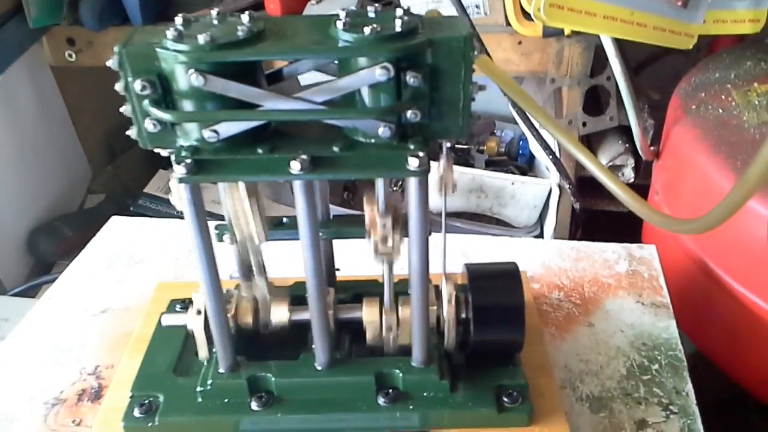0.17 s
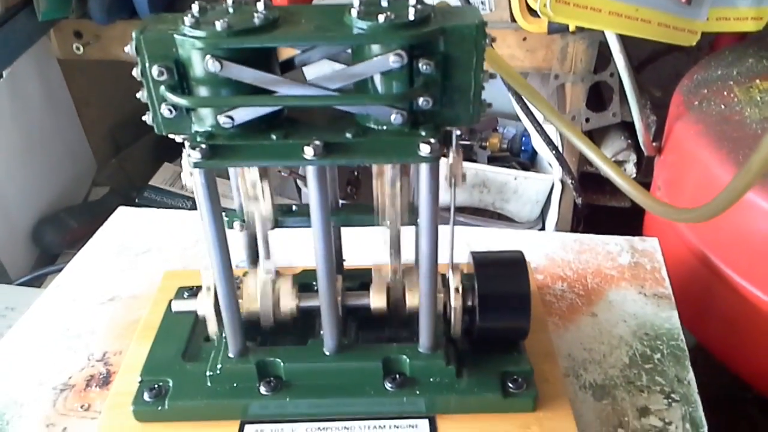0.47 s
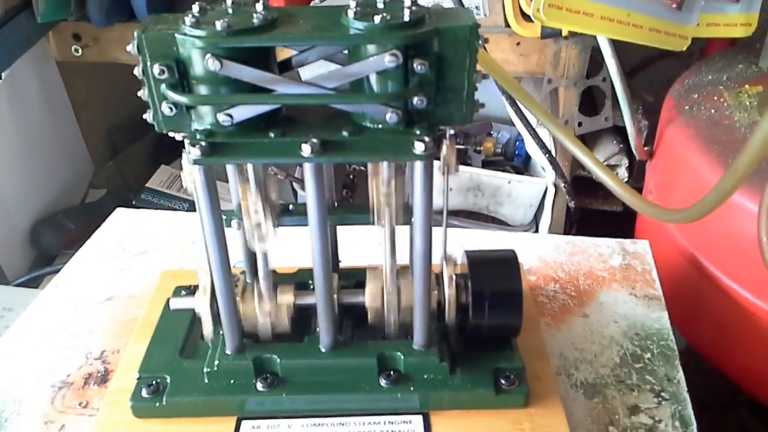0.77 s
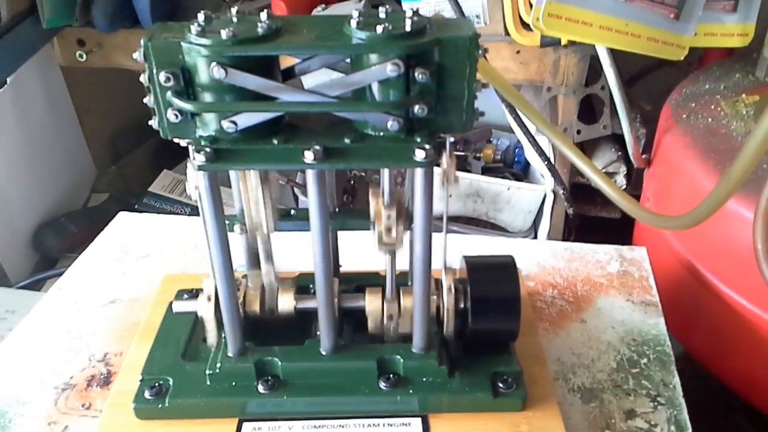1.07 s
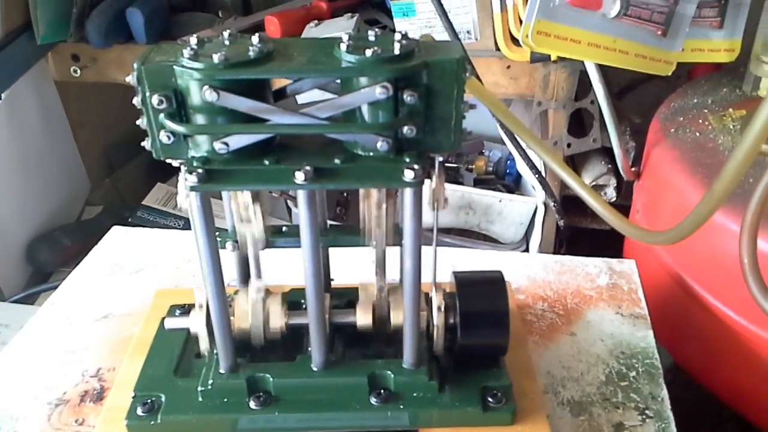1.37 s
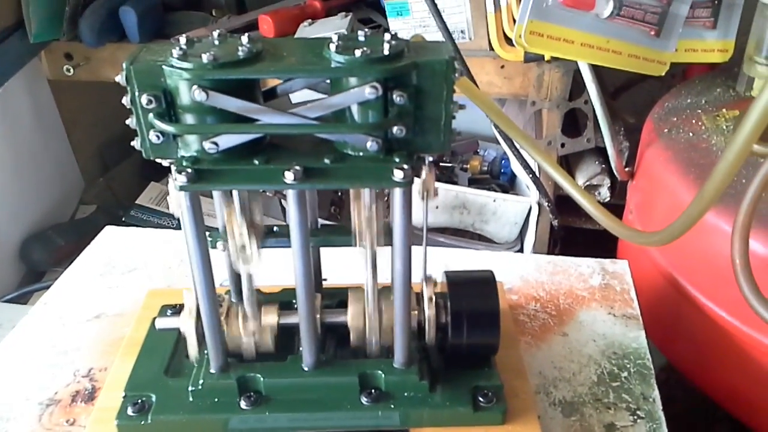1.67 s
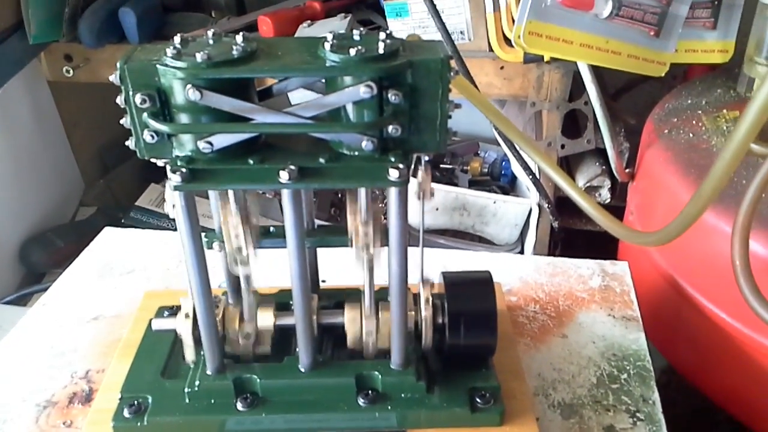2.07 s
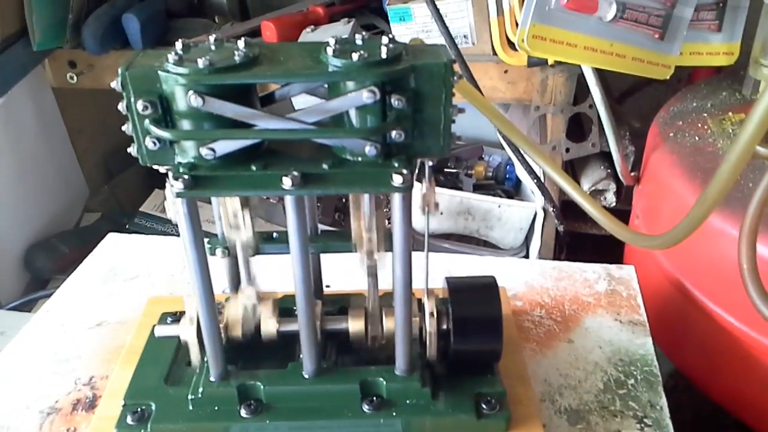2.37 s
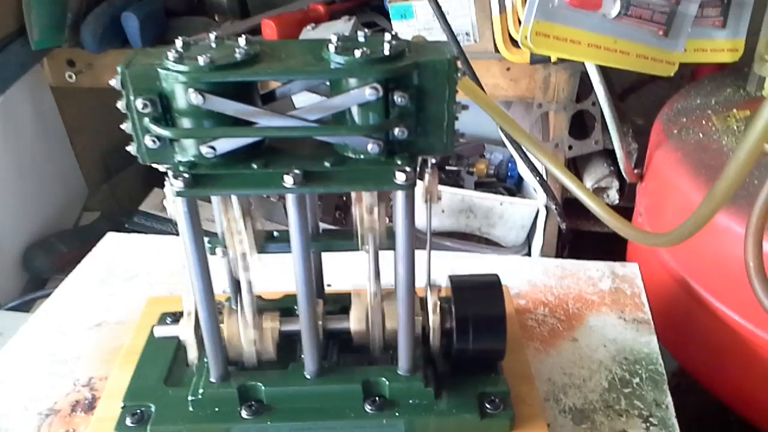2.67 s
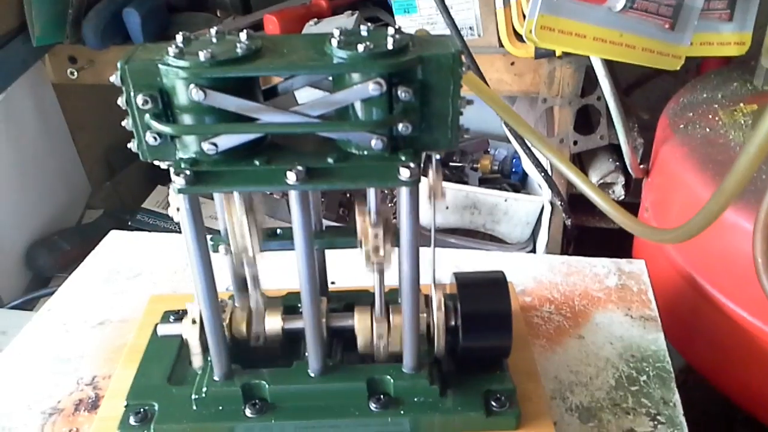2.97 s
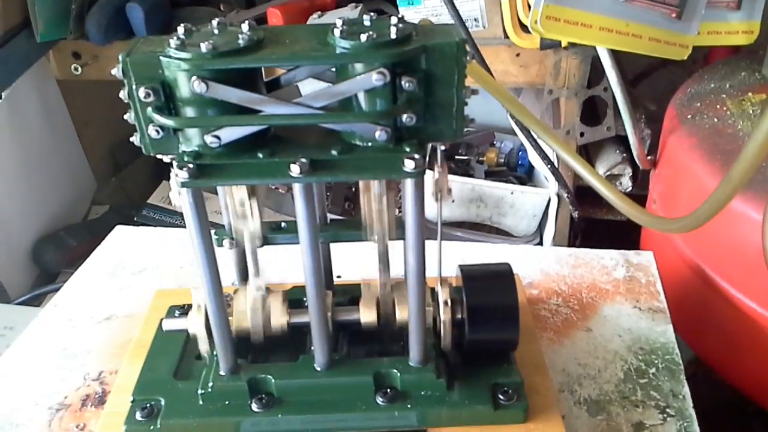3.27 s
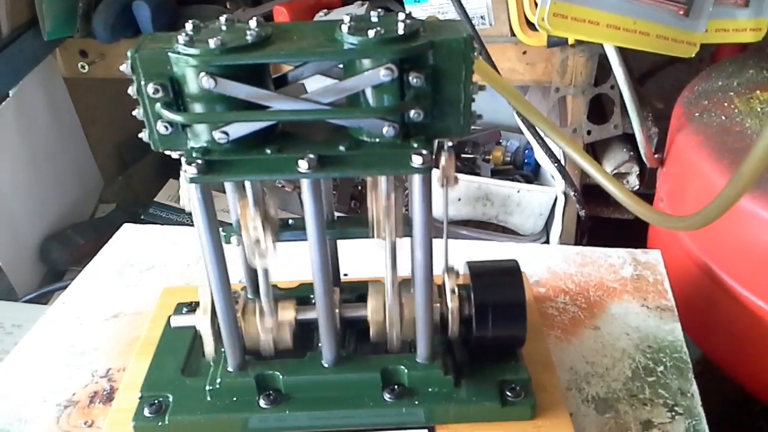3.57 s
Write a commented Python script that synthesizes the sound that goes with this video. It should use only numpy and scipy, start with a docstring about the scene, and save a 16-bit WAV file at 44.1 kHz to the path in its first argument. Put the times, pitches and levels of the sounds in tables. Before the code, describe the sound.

A small twin-cylinder model steam engine runs close to the microphone in a workshop, repeating a dense string of sharp metal ticks about twelve times a second, with airy exhaust hiss, steady from start to end.

```python
"""A small twin-cylinder model engine, close to a mono camera, runs on compressed air at about twelve turns a second.
Rods and valve gear repeat one string of knocks and ticks every turn: decaying clicks that excite frame modes.
Brief bright noise bursts mark some of the contacts; base plate and bench are struck as banks of damped modes.
Sliding parts drive frame and base with gritty noise; exhaust air is coloured noise with narrow resonances.
A short noisy wall tail and a low, unsteady background noise complete the sound."""
import sys
import numpy as np
from scipy import signal
from scipy.fft import rfft, irfft
from scipy.io import wavfile
from scipy.ndimage import uniform_filter1d

SR = 44100
rng = np.random.default_rng(int(sys.argv[2]) if len(sys.argv) > 2 else 0)


def generate_wav(signal):
    """Clip the signal to [-1, 1] and save it as 16-bit WAV at the path in sys.argv[1]."""
    frames = np.transpose(np.atleast_2d(signal))
    scaled = np.clip(frames, -1, 1) * 32767
    pcm = np.round(scaled).astype(np.int16)
    wavfile.write(sys.argv[1], SR, pcm)


N = 164493

# Knocks of one turn: (time after top centre [s], click level [dB], click pitch [Hz], frame drive level [dB])
KNOCKS = [(.0009, -6.5, 4340, -14), (.0023, -18.5, 1900, -41), (.0026, -8.5, 5860, -37),
          (.0029, -7, 3890, -14), (.0046, -20, 2076, -51), (.0049, -9.5, 3245, -22),
          (.0047, -15.5, 5230, -29), (.0066, -3, 4030, -27), (.0067, -21, 1995, -27.5),
          (.0082, -15.5, 4440, -45), (.0097, -6.5, 3360, -27.5), (0.0116, -15.5, 3390, -52),
          (0.013, -21.5, 2120, -31), (0.0152, -9, 3930, -49), (0.0170, -16.5, 1975, -17),
          (0.0182, -20, 3650, -52), (0.024, -33, 5450, -56), (0.0272, -17, 5300, -25),
          (0.0326, -11, 5500, -33), (0.033, -10, 3590, -24), (.0360, -8, 4130, -31),
          (0.0381, -31, 3400, -25.5), (0.0440, -22.5, 2240, -32), (0.0440, -10, 3800, -17.5),
          (0.0442, -16, 4200, -30), (.0473, 2.5, 4080, -22), (0.0470, -11, 5720, -21.5),
          (0.0524, -9.5, 3550, -17.5), (0.0574, -10, 3090, -25.5), (0.062, -4, 4260, -22.5),
          (0.0621, -6.5, 5670, -50), (0.0619, -22, 1920, -19), (.0645, -24, 2180, -49),
          (0.0663, -8.5, 4140, -47.5), (0.0673, -12, 3950, -30), (0.067, -22.5, 1920, -55),
          (0.0708, -15.5, 4460, -57)]
# Modes of the iron frame: (frequency [Hz], level [dB], decay to -60 dB [s])
FRAME_MODES = [(1850, -11, 0.014), (1990, -3, 0.012), (2256, -10.5, 0.044), (2427, -10, 0.024),
               (2970, -13, 0.026), (3223, -2, 0.028), (3420, -1, 0.012), (3789, -2, 0.029),
               (4140, -7, 0.024), (4218, 2.5, 0.024), (4417, -2.5, 0.024), (4812, -10.5, 0.045),
               (5695, -8, 0.022), (5940, -11.5, 0.006)]
# Brief noise bursts at some of the contacts: (time after top centre [s], level [dB], centre frequency [Hz])
CRACKS = [(.0024, -14, 8600), (.0040, -19, 9000), (.0278, -21, 11500), (.0445, -23, 9500),
          (.0475, -25, 9000), (.0620, -25, 9000)]
# Stroke reversals striking the base plate: (time after top centre [s], level [dB])
BASE_BLOWS = [(.0029, -21), (.0110, -28), (.0240, -30.5), (.0322, -28), (.0390, -32), (.0460, -28.5),
              (.0602, -31)]
# Base plate mode frequencies: (frequency [Hz])
BASE_HZ = [760, 900, 1050, 1198, 1268, 1403, 1670]
# Response of each base plate mode: (level [dB], decay to -60 dB [s])
BASE_RING = [(-6, 0.018), (-4, 0.012), (-5, .016), (-8.5, 0.091), (0, 0.061), (2.5, 0.059), (-11.5, 0.09)]
# Pushes on the bench: (time after top centre [s], level [dB], pitch struck best [Hz])
BENCH_BLOWS = [(.000, -43, 159), (.004, -36.5, 113), (.013, -38, 284), (0.017, -45.5, 50),
               (.022, -43.5, 147), (.024, -41.5, 300), (.030, -39, 95), (.052, -46, 298), (.057, -41.5, 94),
               (.065, -42, 283), (.074, -39.5, 148)]
# Bench mode frequencies: (frequency [Hz])
BENCH_HZ = [48, 80, 109, 148, 190, 255, 353]
# Response of each bench mode: (level [dB], decay to -60 dB [s])
BENCH_RING = [(-3, 0.08), (-6, 0.089), (-2, 0.14), (-0.5, 0.1), (3.5, 0.03), (-2.5, 0.072), (-9.5, 0.36)]
# Sliding friction at every 30 degrees of the crank from top centre: (level [dB])
RUB_DB = [-18, -25.5, -30.5, -30.5, -34, -33.5, -28.5, -31, -34, -28, -29.5, -32]
# Exhaust flow noise at every 30 degrees of the crank from top centre: (level [dB])
HISS_DB = [-29.5, -27.5, -32.5, -32.5, -34.5, -25.5, -25, -24, -26.5, -26, -32.5, -29]
# Relative spectrum of the exhaust hiss: (frequency [Hz], level [dB])
HISS_SPECTRUM = [(500, -11), (1500, 1.5), (3000, 8.5), (5000, 10.5), (6100, -2.5), (7400, 2), (8500, 2.5),
                 (10500, -3), (12500, 2), (13400, -13), (15000, -10.5)]
# Resonances of the exhaust passages: (frequency [Hz], bandwidth [Hz], level [dB])
PORTS = [(6090, 160, -7.5), (6480, 99, -11), (6890, 64, -12), (7385, 270, -8.5), (10370, 180, -28),
         (10670, 180, -15)]
# Level of the whole engine: (time [s], level [dB])
ENGINE_LEVEL = [(0, -2), (1.3, -2), (1.798, -1.4), (2.6, -0.8), (3.73, -1.5)]
# Change in the first rattle of each turn: (time [s], added level [dB], delay [s])
SETTLE = [(0, 0, 0.00028), (1.198, 0.5, 0), (1.699, 1.5, 0.00079), (3.73, 0.5, 0.00036)]
# Relative spectrum of the background noise: (frequency [Hz], level [dB])
ROOM_SPECTRUM = [(15, -43), (25, -10), (119, -14), (356, -4), (428, -20), (484, -9), (560, -12), (800, -8),
                 (1000, -8), (1300, -21), (2200, -60)]

FIRST_TURN_S, TURN_S, SLOWING_S = .01816, .0817245, 1.2768e-5  # the last multiplies the turn number squared
STRETCH = 0.2  # share of the slowing that reaches the blow times
OPENING_S = .012  # length of the first rattle of a turn
UNEVEN_S, UNEVEN_DB = (.061, .064), 3  # part of the turn that alternates, loud turn against soft turn
JITTER_S, SCATTER_DB = .00003, .7  # spread of each blow in time and level
ACCENT_DB, ACCENT_TURNS = .9, 3  # drift in strength, averaged over this many turns
CLICK_CYCLES, CLICK_RISE_S = 17.04, .00041  # cycles to decay to -60 dB; time constant of the onset
REACH_OCT, MODE_SCATTER_DB, DETUNE = 0.88, .9, .008  # DETUNE is the relative spread of click pitch
CRACK_S, CRACK_WIDTH = 0.0015, 0.11  # decay time constant; half bandwidth over centre frequency
ENGINE_LOW_HZ, BENCH_LOW_HZ = 700, 32  # high-pass cutoffs
BENCH_PUSH_S, BENCH_REACH_OCT, BENCH_SCATTER_DB = 0.0024, .35, 1.5
RUB_GRIT_DB, GRIT_MAX, RUB_BASE_DB = 2.5, 3.5, -8.5  # dB per unit of grit; largest grit; base against frame
FLOW_SPREAD_DB = .7  # unsteadiness of rub and hiss
SHED_T60_S, SHED_DB = 0.033, -14.5
ROOM_DB, ROOM_SPREAD_DB = -51.5, 4
CEILING, MIC_GAIN, TOP_HZ = .97, 1.25, 14700


def knocks():
    """Impact and modal excitation: each contact clicks at its pitch and drives the frame modes near it."""
    t = np.arange(256) / SR
    clicks = np.zeros(N + len(t))
    hits = np.zeros((len(FRAME_MODES), N))
    modes_hz = np.array(FRAME_MODES)[:, 0]
    for s, click_db, hz, frame_db in KNOCKS:
        nearness = np.exp(-.5 * (np.log2(modes_hz / hz) / REACH_OCT) ** 2)
        reach = nearness * undb(frame_db - click_db)
        decay = np.exp(-np.log(1000) * t * hz / CLICK_CYCLES)
        shape = 2 * (1 - np.exp(-t / CLICK_RISE_S)) * decay
        for at, size, chance in zip(*blows(s, click_db, count=1 + len(FRAME_MODES))):
            click_hz = hz * (1 + DETUNE * chance[0])
            clicks[at:at + len(t)] += size * shape * np.sin(2 * np.pi * click_hz * t)
            hits[:, at] += size * undb(MODE_SCATTER_DB * chance[1:]) * reach
    return cut_low(clicks[:N] + body(hits, FRAME_MODES))


def cracks():
    """Band-limited contact noise: brief bright bursts at some of the contacts."""
    out = np.zeros(N)
    fade = np.exp(-np.arange(200) / SR / CRACK_S)
    for s, db, hz in CRACKS:
        envelope = np.convolve(struck([(s, db)]), fade)[:N]
        burst = envelope * rng.standard_normal(N)
        edges = hz * (1 - CRACK_WIDTH), hz * (1 + CRACK_WIDTH)
        out += signal.sosfilt(signal.butter(2, edges, "bandpass", fs=SR, output="sos"), burst)
    return out


def base_plate():
    """Impulse response of a plate: stroke reversals set its damped modes ringing."""
    return cut_low(body([struck(BASE_BLOWS)] * len(BASE_HZ), np.c_[BASE_HZ, BASE_RING]))


def bench():
    """Soft forcing: smooth pushes from moving parts ring nearby bench modes, unevenly from turn to turn."""
    hits = np.zeros((len(BENCH_HZ), N))
    for s, db, hz in BENCH_BLOWS:
        reach = np.exp(-.5 * (np.log2(np.array(BENCH_HZ) / hz) / BENCH_REACH_OCT) ** 2)
        at, size, chance = blows(s, db, count=len(BENCH_HZ))
        hits[:, at] += size * undb(BENCH_SCATTER_DB * chance.T) * reach[:, None]
    # all bench modes keep the same sign
    rings = sum(undb(db) * ring(x, hz, t60) for x, hz, (db, t60) in zip(hits, BENCH_HZ, BENCH_RING))
    push = np.hanning(int(BENCH_PUSH_S * SR) + 2)
    pushed = np.convolve(rings, push / push.sum())[:N]
    return signal.sosfilt(signal.butter(2, BENCH_LOW_HZ, "highpass", fs=SR, output="sos"), pushed)


def rub():
    """Friction excitation: irregular sliding noise, following the crank, drives frame and base modes."""
    size = undb(RUB_GRIT_DB * np.minimum(rng.exponential(size=N), GRIT_MAX))
    grit = crank_level(RUB_DB) * unit(rng.standard_normal(N) * size)
    frame = unit(body([grit] * len(FRAME_MODES), FRAME_MODES))
    base = unit(body([grit] * len(BASE_HZ), np.c_[BASE_HZ, BASE_RING]))
    gain = np.sqrt(np.mean(grit ** 2))  # restores the friction level after normalising
    return cut_low(gain * (frame + undb(RUB_BASE_DB) * base))


def hiss():
    """Flow noise and passage resonance: exhaust air hisses and whistles, swelling with the crank."""
    air = coloured(HISS_SPECTRUM)
    for hz, width, db in PORTS:
        t60 = np.log(1000) / np.pi / width  # decay time follows from bandwidth
        air = air + undb(db) * unit(ring(rng.standard_normal(N), hz, t60))
    return cut_low(crank_level(HISS_DB) * air)


def shed(x):
    """Diffuse reflection: the walls return a short, noisy, exponentially decaying tail."""
    t = np.arange(int(.25 * SR)) / SR
    tail = rng.standard_normal(len(t)) * np.exp(-np.log(1000) * t / SHED_T60_S) * (t > .002)
    return undb(SHED_DB) * signal.fftconvolve(x, tail / np.sqrt(np.sum(tail ** 2)))[:N]


def background():
    """Coloured random noise: a low, unsteady background."""
    return undb(ROOM_DB + ROOM_SPREAD_DB * walk(21)) * coloured(ROOM_SPECTRUM)


def turns():
    """Rotational kinematics: top-centre times [s] of an engine that slows a little."""
    k = np.arange(-1, 47)
    return FIRST_TURN_S + TURN_S * k + SLOWING_S * k ** 2


def blows(s, db, count):
    """Cyclic impact: sample, size and spare chance of a blow s seconds after every top centre."""
    start = turns()
    period = np.gradient(start)
    stretch = 1 + STRETCH * (period / np.mean(period) - 1)
    chance = rng.standard_normal((len(start), 3 + count))
    when, firm_db, late_s = np.array(SETTLE).T
    opening = s < OPENING_S
    firm_db = np.interp(start, when, firm_db) * opening
    late_s = np.interp(start, when, late_s) * opening
    at = np.round((start + s * stretch + late_s + JITTER_S * chance[:, 0]) * SR).astype(int)
    alternate = (-1) ** np.arange(len(start)) / 2 * (UNEVEN_S[0] < s < UNEVEN_S[1])
    accent = ACCENT_DB * unit(uniform_filter1d(chance[:, 2], size=ACCENT_TURNS))
    size = undb(db + firm_db + accent + SCATTER_DB * chance[:, 1] + UNEVEN_DB * alternate)
    keep = (at >= 0) & (at < N)
    return at[keep], size[keep], chance[keep, 3:]


def struck(table):
    """Impulsive forcing: an impulse train from (time [s], level [dB]) rows, repeated every turn."""
    x = np.zeros(N)
    for s, db in table:
        at, size, _ = blows(s, db, count=0)
        x[at] += size
    return x


def crank_level(db):
    """Periodic modulation: gain that follows the crank angle, slightly unsteady."""
    start = turns()
    crank = np.interp(np.arange(N) / SR, start, np.arange(len(start))) * len(db)
    return undb(np.interp(crank, np.arange(len(db)), db, period=len(db)) + FLOW_SPREAD_DB * walk(58))


def cut_low(x):
    """High-pass filtering: removes the low end of knocks, base, rub and hiss."""
    return signal.sosfilt(signal.butter(4, ENGINE_LOW_HZ, "highpass", fs=SR, output="sos"), x)


def ring(x, hz, t60):
    """Damped resonator: one decaying mode, in which a unit blow starts a sine of size 1."""
    r = np.exp(-np.log(1000) / (t60 * SR))
    w = 2 * np.pi * hz / SR
    return signal.lfilter([0, np.sin(w)], [1, -2 * r * np.cos(w), r * r], x)


def body(drives, modes):
    """Modal superposition: one drive per mode, with neighbouring modes in opposite phase."""
    return sum((-1) ** k * undb(db) * ring(x, hz, t60)
               for k, (x, (hz, db, t60)) in enumerate(zip(drives, modes)))


def coloured(points):
    """Spectral shaping: noise of rms 1 from (frequency [Hz], level [dB]) points."""
    hz, db = np.array(points).T
    f = np.maximum(np.arange(N // 2 + 1) * SR / N, 1)
    gain = undb(np.interp(np.log(f), np.log(hz), db, right=-60))
    return unit(irfft(rfft(rng.standard_normal(N)) * gain, N))


def walk(rate):
    """Low-pass random process: a slow fluctuation of rms 1, smoothed twice over 1 / rate [s]."""
    k = int(SR / rate)
    return unit(uniform_filter1d(uniform_filter1d(rng.standard_normal(N), k), k))


def undb(db):
    """Logarithmic level: dB to amplitude ratio."""
    return 10 ** (np.asarray(db) / 20)


def unit(x):
    """Energy normalisation: scale to rms 1."""
    return x / np.sqrt(np.mean(x ** 2))


def scene():
    """Linear superposition: engine, its wall tail and the background, alike on both channels."""
    sources = knocks() + cracks() + base_plate() + bench() + rub() + hiss()
    engine = sources * undb(np.interp(np.arange(N) / SR, *np.array(ENGINE_LEVEL).T))
    mono = engine + shed(engine) + background()
    return np.array([mono, mono])


def record(dry):
    """Saturation and band limiting: the camera rounds the highest peaks and cuts the top."""
    rounded = CEILING * np.tanh(MIC_GAIN * dry / CEILING)
    return signal.sosfilt(signal.ellip(10, .2, 75, TOP_HZ, fs=SR, output="sos"), rounded)


dry = scene()
out = record(dry)
generate_wav(out)
```